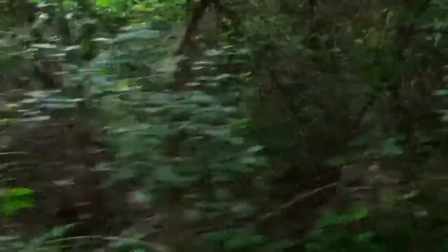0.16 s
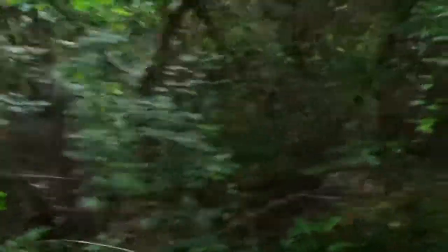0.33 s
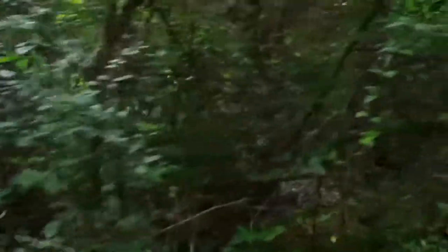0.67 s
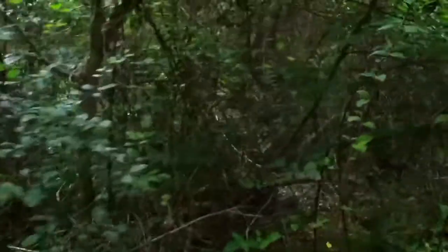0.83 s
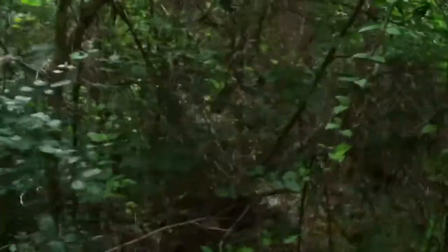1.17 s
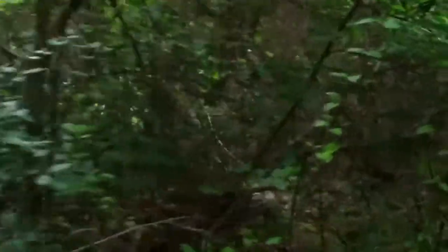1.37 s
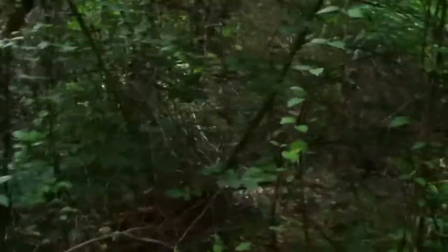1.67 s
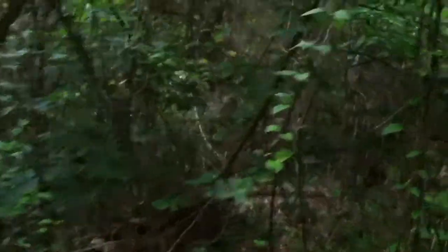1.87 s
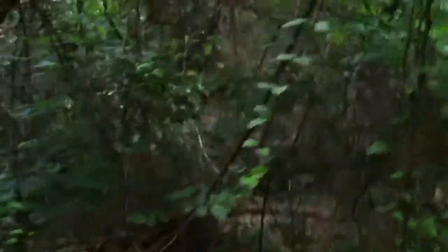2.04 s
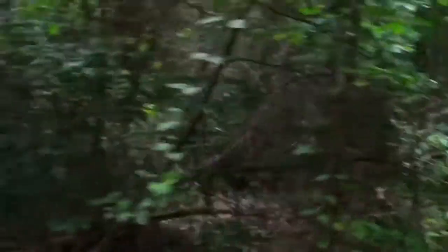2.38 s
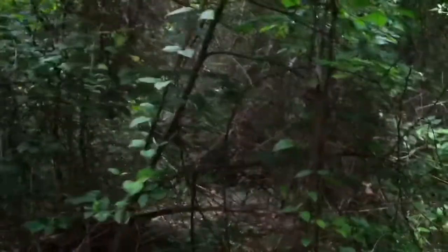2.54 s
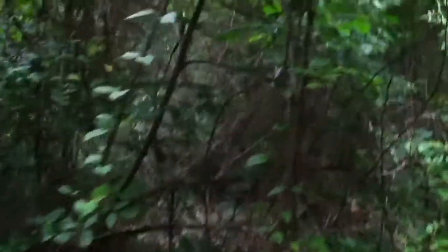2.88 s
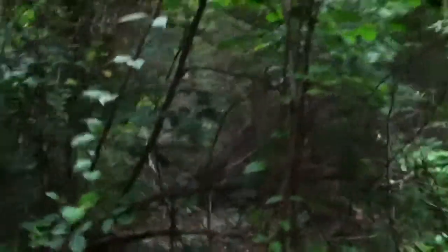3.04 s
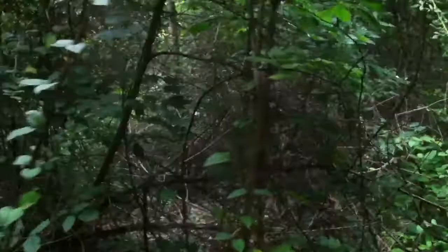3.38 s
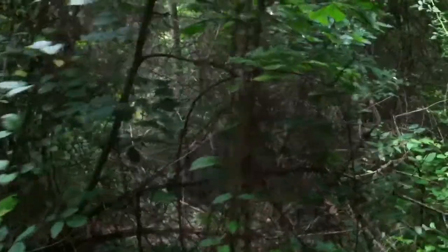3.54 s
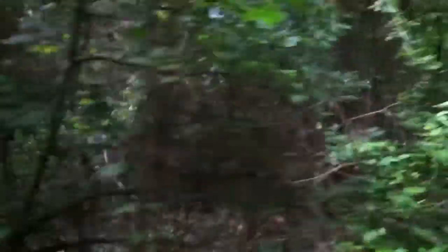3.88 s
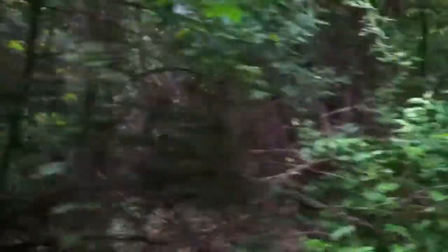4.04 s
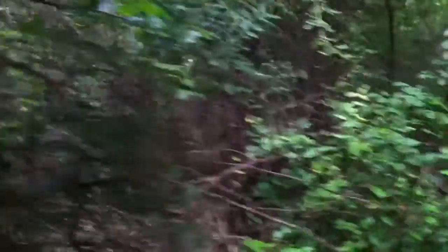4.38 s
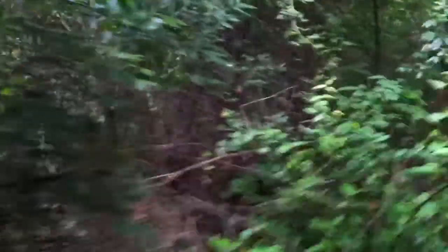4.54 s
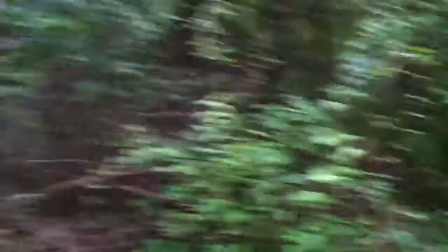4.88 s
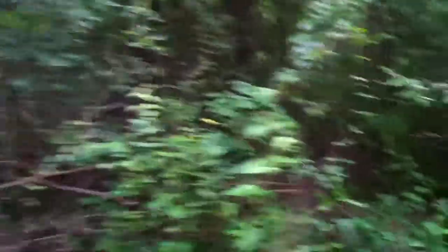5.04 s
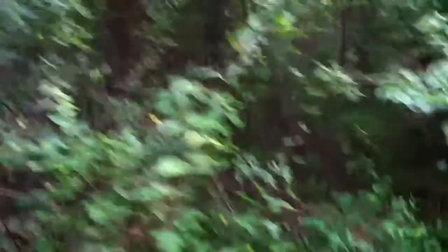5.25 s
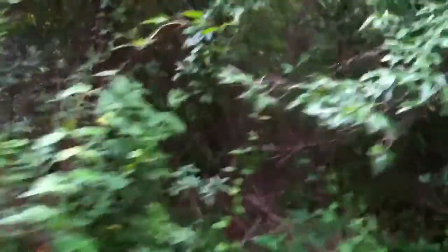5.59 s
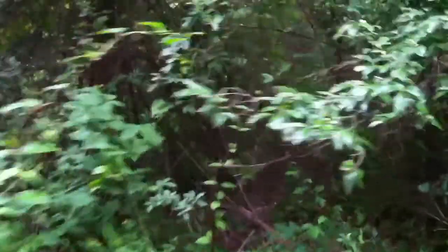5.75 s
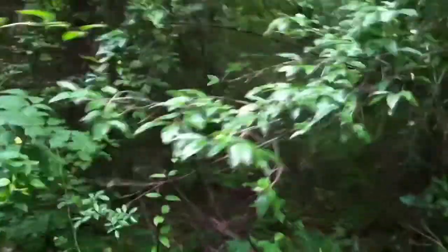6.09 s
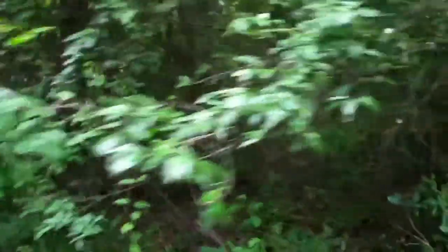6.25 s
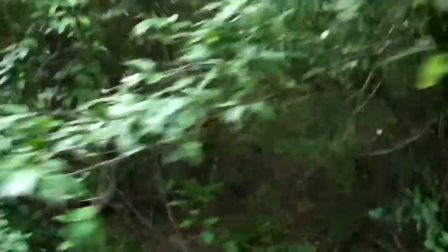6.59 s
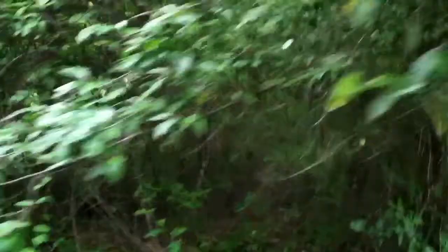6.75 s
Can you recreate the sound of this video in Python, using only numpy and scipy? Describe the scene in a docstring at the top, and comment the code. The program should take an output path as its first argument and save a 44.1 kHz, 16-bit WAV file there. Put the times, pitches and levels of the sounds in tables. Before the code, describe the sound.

A pack of hounds gives tongue among trees, heard outdoors by a microphone near the undergrowth. Clear rising yelps come first, with thin squeaks and small leaf rustles, then only foliage hiss and insects for a moment. Rasping bays follow, wetter with woodland echo and more distant, then a brief drooping howl overlapped by a faint far call. One final hoarse bark rings away into the steady hiss.

```python
"""Hounds giving tongue in dense woodland

A pack calls among the trees: first clear yelps, then hoarse bays and one sinking howl, with thin squeaks and chirps.
Each voice is a strong fundamental with weak overtones, which disorder from cycle to cycle turns into a rasp.
Random echoes from the trunks add a quick spray and a faint, long tail. Shaped noise makes a steady hiss of leaves
and bands of insects; grainy noise bursts make the undergrowth rustle a few times close by.
"""
import sys
import numpy as np
from scipy import signal
from scipy.fft import rfft, irfft, next_fast_len
from scipy.io import wavfile
from scipy.ndimage import uniform_filter1d

SR = 44100
rng = np.random.default_rng(int(sys.argv[2]) if len(sys.argv) > 2 else 0)


def wav_record(signal):
    """Record a signal, one row per channel, as 16-bit PCM in the file named by sys.argv[1]."""
    frames = np.transpose(np.atleast_2d(signal))
    bounded = np.clip(frames, -1, 1)
    # unit amplitude maps onto the largest positive 16-bit level
    quanta = np.round(bounded * 32767).astype(np.int16)
    wavfile.write(sys.argv[1], SR, quanta)


N = 305172  # length in samples

# The barks, from clear yelps to hoarse bays. Each row: start in seconds, length in seconds, attack in seconds,
# mouth opening after seconds, closing time in seconds, pitch in Hz, pitch step on opening in Hz,
# later climb in Hz per second (negative falls), level in dB, swell on opening in dB,
# second harmonic in dB, upper harmonics in dB, roughness from 0 to 1, scatter from the trees in dB.
BARKS = [ (0.0, 0.18, 0.001, 0.03, 0.064, 585, 19, 902, -12, -0.5, -25.5, -31.5, 0.21, -7),
         (.536, 0.12, 0.011, .035, 0.041, 599.7, 40.5, 381.5, -8.5, 2.5, -30, -33, 0.06, -12.5),
         (.841, .197, 0.03, 0.034, 0.063, 524.5, 65, 418, -17.5, 7.5, -36.5, -41.5, 0.02, -4.5),
         (1.332, 0.12, 0.0064, 0.023, 0.029, 593.7, 22.5, 275, -17.5, 7, -36.5, -51, 0.06, -2),
         (1.625, 0.16, .013, 0.06, .061, 562.4, 71, 579, -16, 10, -34.5, -39.5, 0.07, -5),
         (2.988, 0.19, 0.023, 0.068, 0.077, 733.7, -5, -50, -21, 2.5, -38, -41.5, 0.69, 2),
         (3.248, 0.16, 0.016, .021, 0.04, 709.5, 14, 380, -23.5, 5, -48.5, -42, 0.75, 0.5),
         (3.661, 0.21, 0.031, 0.031, 0.1, 628, 13.5, 482, -17, 13, -37, -38, 0.49, 2.5),
         (4.204, 0.23, 0.026, 0.058, 0.11, 570.2, 47, 563, -20, 8, -39.5, -40, 0.46, 1.5),
         (5.355, 0.21, 0.03, 0.045, 0.13, 668, 32.5, -150, -16.6, 9, -34.5, -37.5, 0.57, -3)]
# How a hoarse voice spreads round each harmonic. Each row: offset as a share of the pitch, strength in dB.
HOARSE_SPREAD = [(-0.81, -49.5), (-0.607, -27), (-0.443, -37.5), (-0.305, -23.5), (-0.2, -14), (-0.066, -6),
                 (-0.061, 1), (-0.37, 7), (0.46, -12), (0.73, -25), (0.77, -34)]
# Response of the throat, from the third harmonic up. Each row: frequency in Hz, gain in dB.
THROAT = [(1450, 10.5), (1750, 7), (2100, -6), (2350, -4), (2650, -12.5), (3500, -19.5), (5000, -29.5),
          (7000, -68)]
# Resonance of the open mouth on the second harmonic of a bark. Each row: frequency in Hz, gain in dB.
MOUTH = [(1040, -1), (1130, -0.5), (1230, 1), (1320, -3), (1450, -5.5)]
# How long the far scatter rings. Each row: frequency in Hz, time to fall by 60 dB in seconds.
WOOD_T60 = [(200, 0.73), (650, 1.73), (2000, 2.5), (6000, 0.26)]
# Colour of the foliage hiss. Each row: frequency in Hz, relative gain in dB.
AIR_COLOUR = [(18, -71), (30, -53), (47, -60.5), (68, -30.5), (131, -10.5), (290, -7.5), (583, -5),
              (642, -1), (798, -2.5), (1950, -0.5), (2600, -4.5), (3010, -5), (3310, -6), (7350, -16.5),
              (9580, -22), (12500, -32.5), (21100, -120)]
# Insect choruses. Each row: centre in Hz, width in Hz, level in dB before the stir.
INSECTS = [(2990, 70, -61), (7150, 2300, -57.5), (4825, 1400, -58)]
# How much the foliage and insects stir. Each row: time in seconds, gain in dB.
STIR = [(0, 3), (1.201, -0.5), (4.0, 0.2), (5.8, 0.44), (6.3, -1.5)]
# Faint high chirps, all with the same slight fall. Each row: start in seconds, length in seconds, level in dB.
CHIRPS = [(0.027, .041, -48.5), (.897, 0.036, -45.5), (1.34, 0.034, -46), (2.377, 0.13, -52.5),
          (3.72, 0.032, -43.5), (4.053, 0.039, -48), (5.97, 0.035, -49.5)]
# Brushes of leaves and a twig snap. Each row: start in seconds, level in dB before the decay,
# decay in seconds, centre in Hz, width in octaves.
RUSTLES = [(0.106, -42.5, 0.042, 6070, 0.69), (0.423, -41, 0.041, 5960, 0.78),
           (.42, -37.5, 0.018, 650, 0.38), (1.051, -33, .004, 12000, 4.2),
           (1.053, -38.5, 0.025, 7000, 0.37), (2.423, -52, 0.029, 8000, 0.64),
           (5.236, -47, 0.029, 210, 0.49), (5.269, -52.5, 0.038, 6450, 0.82)]
# Thin squeaks round the barks. Each row: start in seconds, length in seconds, starting pitch in Hz, level in dB.
SQUEAKS = [(0.155, 0.061, 2080, -45), (0.23, 0.045, 2020, -49), (0.514, 0.051, 1322, -32),
           (1.302, 0.039, 1306, -37.5), (3.003, 0.049, 1085, -39), (3.106, 0.055, 1660, -43.5),
           (3.641, 0.11, 1388, -41), (3.807, 0.033, 1980, -37), (3.888, 0.061, 2003, -48),
           (4.335, .13, 1660, -46), (5.466, 0.045, 1011, -29.5)]
# Soft low bumps just after some barks begin. Each row: start in seconds, level in dB before the decay.
BUMPS = [(0.547, -47.5), (1.641, -63), (3.01, -58), (3.684, -60)]
# Three gliding calls, a curve each. Each row: time in seconds, pitch in Hz, level in dB,
# second harmonic in dB, upper harmonics in dB.
WHINE = [(3.09, 914, -34.5, -48, -64), (3.16, 954.5, -24.5, -52, -59), (3.185, 1041, -52, -62, -61),
         (3.235, 1148, -37.5, -42, -44), (3.3, 940, -50, -44, -68)]
HOWL = [(4.59, 665, -34, -39, -63), (4.602, 631, -33, -47, -50), (4.668, 674.6, -21, -40, -37),
        (4.696, 577.5, -35.5, -38, -49), (4.716, 519.5, -42.5, -53, -64), (4.832, 537.4, -39.5, -50.5, -57),
        (4.88, 510.7, -40.5, -41, -54), (5.014, 502, -43, -34.5, -57), (5.08, 630, -36, -63, -56),
        (5.094, 601, -35.5, -49, -56), (5.12, 584, -54, -60, -62)]
FAR_HOWL = [(4.7, 685, -37, -54, -46), (4.79, 765, -39.5, -68, -69), (4.87, 711, -46.5, -65, -68),
            (4.97, 675, -44, -61, -69)]
# Who sings the curves. Each row: curve, roughness from 0 to 1, scatter from the trees in dB.
GLIDES = [(HOWL, 0.027, 0.87), (FAR_HOWL, 0.39, -1), (WHINE, 0.1, -4.5)]

OPENING_S = 0.0046  # how quickly the mouth snaps open
SAG_DB_PER_S = 27.5  # the breath runs down once the mouth is open
CLOSE_DB, CLOSE_CURVE = -24, 1.59  # the fall as the mouth closes, slow at first
OVERTONE_CLOSE = 0.74  # share of that fall which the overtones follow
DROOP_HZ = -11  # the pitch falls back as the mouth closes
ROUGH_ENDS = 0.93  # the voice is rougher by up to this share where it is weak
CRACK = 0.035  # extra roughness as the mouth opens
PURER_DB, PURE_BELOW = -12, 0.67  # most that the upper harmonics lose on opening, in voices below this roughness
ACCENT_DB, ACCENT_S = 1.5, 0.013  # the level overshoots briefly as the mouth opens
FLUTTER_DB, FLUTTER_HZ = 0.68, 25  # the breath is never quite even
AIR_DB = -46  # hiss level before its swell and the stir
CHIRP_START_HZ, CHIRP_END_HZ = 3050, 2998
SQUEAK_SINK = 0.023  # each squeak sinks by this share of its pitch
BUMP_DECAY_S, BUMP_HZ, BUMP_OCTAVES = 0.027, 95, 1.1
EDGE_HZ = 14800  # top of the band


def amp(db):
    """Decibels to gain."""
    return 10 ** (np.asarray(db) / 20)


def unit(x):
    """Scales to rms 1."""
    return x / np.sqrt(np.mean(abs(x) ** 2) + 1e-20)


def read(points, hz):
    """Reads a table of frequency and value on a log-frequency axis."""
    f, value = np.transpose(points)
    return np.interp(np.log(hz + 1), np.log(f + 1), value)


def add(mix, s, sound):
    """Adds a sound to the mix at time s."""
    part = mix[max(round(s * SR), 0):][:len(sound)]
    part += sound[:len(part)]


def wander(size, hz):
    """Random drift of about rms 1, mostly slower than hz."""
    f = np.fft.rfftfreq(size + SR, 1 / SR)
    lowpass = np.exp(-0.5 * (f / hz) ** 2)
    return unit(irfft(rfft(rng.standard_normal(size + SR)) * lowpass))[:size]


def chaos(turns, order=8, size=4096, steadiness=0.17, sideband_db=1.0, pattern_cycles=4.33):
    """Cycle-to-cycle disorder in the strength and timing of the vocal folds, as a complex factor."""
    offset = np.fft.fftfreq(size, 1 / order)
    # the disorder nearly repeats every few cycles, which gathers it into loose sidebands
    repeat = pattern_cycles * rng.uniform(0.888, 1.15)
    sidebands = sideband_db * np.cos(2 * np.pi * offset * repeat)
    spread_db = np.interp(offset, *np.transpose(HOARSE_SPREAD), left=-90, right=-90) + sidebands
    random_phase = np.exp(2j * np.pi * rng.random(size))
    disorder = np.fft.ifft(amp(spread_db) * random_phase)
    disorder = unit(signal.resample(disorder, size * order))
    # follow the turns of the folds, so the spread scales with the pitch
    disorder = np.interp(turns * order ** 2, np.arange(len(disorder)), disorder)
    # steady lung pressure evens out the power over a few cycles
    power = uniform_filter1d(abs(disorder) ** 2, size=400)
    return unit(disorder / (power + 0.02) ** (np.clip(steadiness, 0, 1) / 2))


def partial(turns, k, rough):
    """Harmonic k of the vocal folds: part steady, part disordered."""
    share = np.clip(rough, 0, 1)
    folds = np.sqrt(1 - share ** 2) + share * chaos(turns)
    return (folds * np.exp(2j * np.pi * (k * turns + rng.random()))).real


def throat(x):
    """The unchanging colour that the throat gives the upper harmonics."""
    size = next_fast_len(len(x) + 2048)
    gain = amp(read(THROAT, np.fft.rfftfreq(size, 1 / SR)))
    return irfft(rfft(x, size) * gain, size)[:len(x)]


def voice(hz, level_db, second_db, upper_db, rough, jitter=0.0037, hoarse_jitter=0.019, release=0.0067, count=8):
    """A hound's voice: a strong fundamental and weak overtones, each breaking into a rasp as it turns hoarse."""
    t = np.arange(len(hz)) / SR
    unsteady = (jitter + hoarse_jitter * rough) * wander(len(t), 90)
    turns = np.cumsum(hz * (1 + unsteady)) / SR
    # the higher the overtone, the more an uneven cycle smears it
    second = partial(turns, 2, 0.2 + 1.3 * rough)
    upper = sum(partial(turns, k, 0.3 + 0.8 * k * rough) for k in range(3, count + 1))
    sound = amp(level_db) * partial(turns, 1, rough)
    sound = sound + amp(second_db) * second + amp(upper_db) * throat(upper)
    fade = np.clip(np.minimum(t / 0.003, (t[-1] - t) / release), 0, 1)
    return np.sqrt(2) * sound * fade


def bark(length, attack, opens, closing, pitch_hz, leap_hz, climb, level_db, swell_db, second_db, upper_db, rough):
    """A call starts pinched; the opening mouth shifts its pitch and swells it, then it glides until the mouth shuts."""
    t = np.arange(0, length, 1 / SR)
    mouth = 0.5 + 0.5 * np.tanh((t - opens) / (2 * OPENING_S))
    open_for = np.maximum(t - opens, 0)
    shut = np.clip(1 - (length - t) / closing, 0, 1) ** CLOSE_CURVE
    hz = pitch_hz + leap_hz * mouth + climb * open_for + DROOP_HZ * shut
    # swell and sag move the fundamental only
    effort_db = CLOSE_DB * shut - swell_db * (1 - mouth) - SAG_DB_PER_S * open_for
    accent_db = ACCENT_DB * mouth * np.exp(-(open_for / ACCENT_S) ** 2)
    uneven_db = accent_db + FLUTTER_DB * wander(len(t), FLUTTER_HZ)
    overtone_db = OVERTONE_CLOSE * CLOSE_DB * shut + uneven_db
    # clear voices grow purer as the mouth opens
    purer_db = PURER_DB * mouth * max(1 - rough / PURE_BELOW, 0)
    rasp = rough * (1 + ROUGH_ENDS * (1 - amp(effort_db))) + CRACK * np.sin(np.pi * mouth)
    fundamental_db = level_db + effort_db + uneven_db
    second_db = second_db + overtone_db + read(MOUTH, 2 * hz)
    upper_db = upper_db + overtone_db + purer_db
    return voice(hz, fundamental_db, second_db, upper_db, rasp) * np.minimum(t / attack, 1)


def woodland(x, tail_db=-23.5, near_db=-8.0, near_t60=0.31, build=0.031):
    """Scatter from the trunks: a quick spray from near trees and a long, dull tail from far ones."""
    size = 2 * SR
    # about 2000 echoes a second, of random sign
    taps = rng.choice([-1.0, 1.0], (2, size)) * (rng.random((2, size)) < 2000 / SR)
    hz, frame_s, z = signal.stft(taps[0], SR, nperseg=256)
    decay = amp(-60 * frame_s / read(WOOD_T60, hz)[:, None])
    far = signal.istft(z * decay, SR, nperseg=256)[1][:size]
    t = np.arange(size) / SR
    far = far * (1 - np.exp(-t / build))
    near = taps[1] * np.exp(-np.log(1000) * t / near_t60) * (t > 0.006)
    response = amp(tail_db) * far / np.linalg.norm(far) + amp(near_db) * near / np.linalg.norm(near)
    return signal.fftconvolve(x, response)[:N]


def air(patch_db=1.0, swell_db=0.24):
    """A wide hiss of foliage: coloured noise with drifting patches in time and frequency."""
    hz, _, z = signal.stft(rng.standard_normal(N), SR, nperseg=2048, noverlap=1536)
    patches = uniform_filter1d(rng.standard_normal(z.shape), size=30, axis=0)
    patches = unit(uniform_filter1d(patches, size=8, axis=1))
    gain = amp(read(AIR_COLOUR, hz)[:, None] + patch_db * patches)
    hiss = signal.istft(z * gain, SR, nperseg=2048, noverlap=1536)[1][:N]
    return amp(AIR_DB) * unit(hiss) * amp(swell_db * wander(N, 1.1))


def leaf_ticks(per_s=25, ticks_db=-76.0, low_hz=2500, high_hz=6500):
    """Tiny scattered ticks in the undergrowth: random clicks that gate short, band-limited noise."""
    strength_db = 2.6 * np.minimum(rng.exponential(1, N), 3)
    clicks = (rng.random(N) < per_s / SR) * amp(strength_db)
    # each click dies away over 1.6 ms
    envelope = signal.lfilter([1], [1, -np.exp(-1 / (0.0016 * SR))], clicks)
    bursts = envelope * rng.standard_normal(N)
    band = signal.butter(4, [low_hz, high_hz], "band", fs=SR, output="sos")
    return amp(ticks_db) * unit(signal.sosfilt(band, bursts))


def insects(swell_db=0.9):
    """Bands of distant shrilling: slow noise on a carrier, which swells and fades."""
    t = np.arange(N) / SR
    chorus = np.zeros(N)
    for hz, width, db in INSECTS:
        shrill = wander(N, width / 2) * np.cos(2 * np.pi * hz * t)
        chorus += amp(db) * unit(shrill * amp(swell_db * wander(N, 3)))
    return chorus


def whistle(s, length, start_hz, end_hz, db, jitter=0.006):
    """A short, nearly pure glide with its start time: a sine with a slightly unsteady pitch."""
    size = round(length * SR)
    hz = np.linspace(start_hz, end_hz, size) * (1 + jitter * wander(size, 120))
    tone = np.sin(2 * np.pi * np.cumsum(hz) / SR)
    return s, np.sqrt(2) * amp(db) * tone * signal.windows.tukey(size, 0.5)


def chirp(s, length, db):
    """A faint high chirp: a whistle that falls slightly."""
    return whistle(s, length, CHIRP_START_HZ, CHIRP_END_HZ, db)


def rustle(s, db, decay, centre_hz, octaves, grain_db=-3.0, rise=0.00032, top_hz=10000):
    """A grainy noise burst that starts at once and dies away; its highest treble is rolled off."""
    t = np.arange(SR // 2) / SR
    f = np.fft.rfftfreq(len(t), 1 / SR)
    grains = rng.standard_normal(len(t)) * amp(grain_db * wander(len(t), 250))
    colour = 1 / (1 + (np.log2((f + 1) / centre_hz) / octaves) ** 2)
    colour = colour / np.sqrt(1 + (f / top_hz) ** 10)
    burst = unit(irfft(rfft(grains) * colour, len(t)))
    return s, amp(db) * burst * np.exp(-t / decay) * (1 - np.exp(-t / rise))


def squeak(s, length, hz, db):
    """A thin squeak: a whistle that sinks a little."""
    return whistle(s, length, hz, hz * (1 - SQUEAK_SINK), db)


def bump(s, db):
    """A soft low bump: a short noise burst shaped like a rustle but centred in the bass."""
    return rustle(s, db, BUMP_DECAY_S, BUMP_HZ, BUMP_OCTAVES)


def howl(curve, rough):
    """A call that glides along its curve of pitch and levels, whatever colour the throat has there."""
    s, *columns = np.transpose(curve)
    t = np.arange(s[0], s[-1], 1 / SR)
    hz, level_db, second_db, upper_db = (np.interp(t, s, column) for column in columns)
    # cancel the throat's gain at the third harmonic
    return voice(hz, level_db, second_db, upper_db - read(THROAT, 3 * hz), rough)


def pack():
    """Every call as start in seconds, sound and scatter in dB."""
    calls = [(s, bark(*shape), scatter_db) for s, *shape, scatter_db in BARKS]
    calls += [(*chirp(*row), 0) for row in CHIRPS]
    calls += [(*squeak(*row), 0) for row in SQUEAKS]
    calls += [(curve[0][0], howl(curve, rough), scatter_db) for curve, rough, scatter_db in GLIDES]
    return calls


def scene():
    """The hounds among the trees, with the sounds of the wood round them."""
    direct, scattered = np.zeros(N), np.zeros(N)
    for s, call, scatter_db in pack():
        add(direct, s, call)
        add(scattered, s, amp(scatter_db) * call)
    # rustles and bumps stay dry
    for row in RUSTLES:
        add(direct, *rustle(*row))
    for row in BUMPS:
        add(direct, *bump(*row))
    stir = amp(np.interp(np.arange(N) / SR, *np.transpose(STIR)))
    wood = stir * (air() + leaf_ticks() + insects())
    return (direct + woodland(scattered) + wood)[None]


def record(dry):
    """Limits the band with a steep low-pass at EDGE_HZ."""
    lowpass = signal.firwin(511, EDGE_HZ, window=("kaiser", 9), fs=SR)
    return signal.oaconvolve(dry, lowpass[None], "same")


dry = scene()
out = record(dry)
wav_record(out)
```